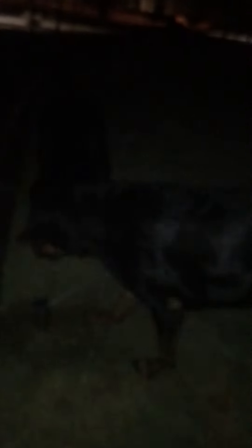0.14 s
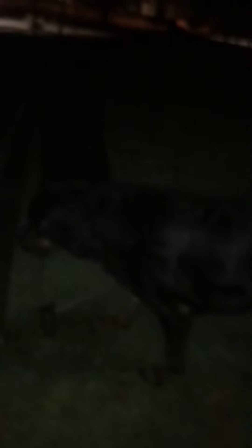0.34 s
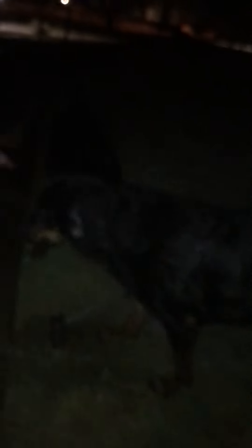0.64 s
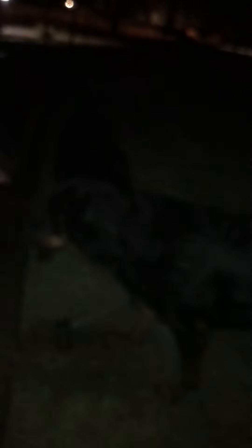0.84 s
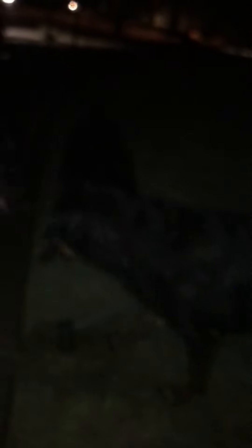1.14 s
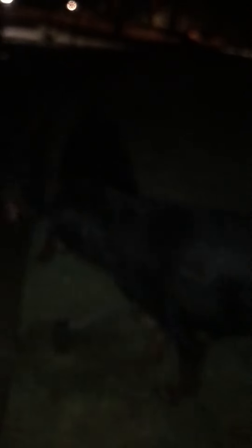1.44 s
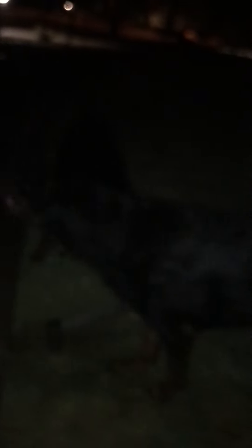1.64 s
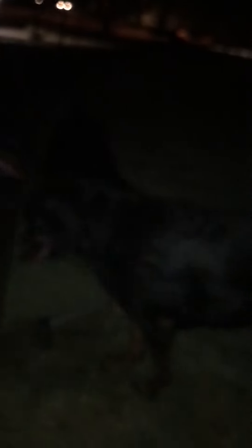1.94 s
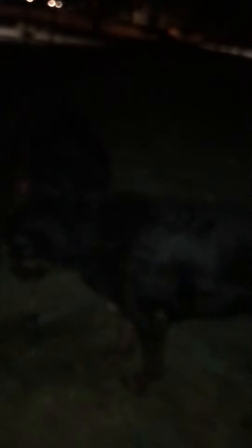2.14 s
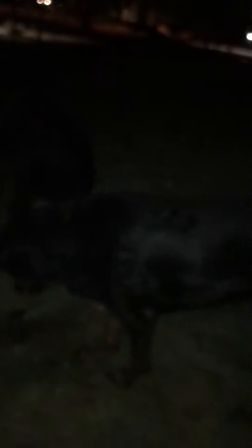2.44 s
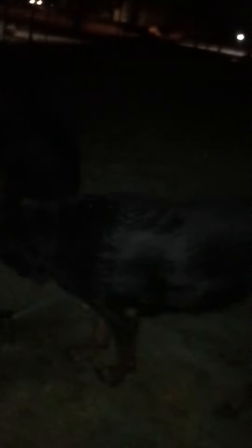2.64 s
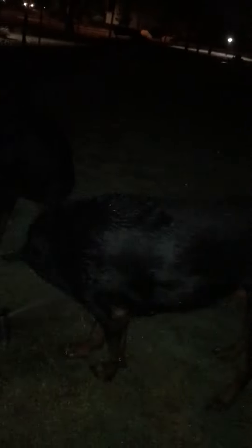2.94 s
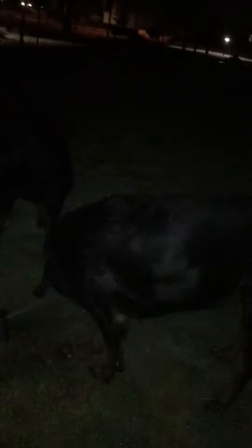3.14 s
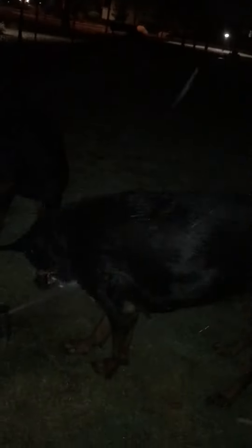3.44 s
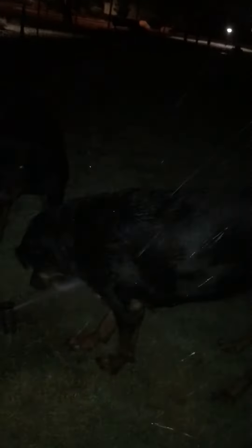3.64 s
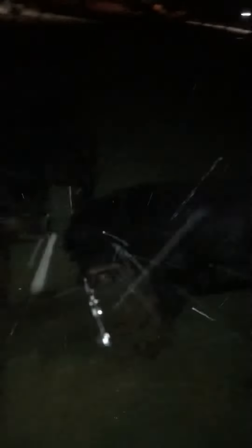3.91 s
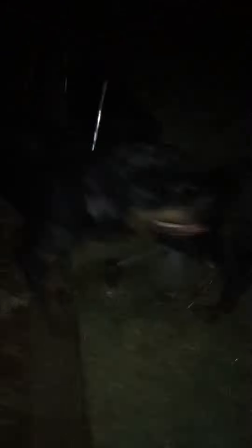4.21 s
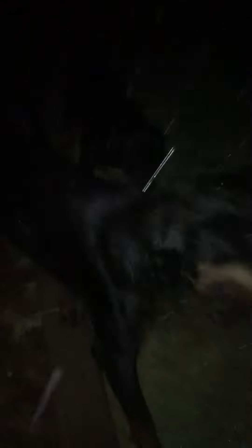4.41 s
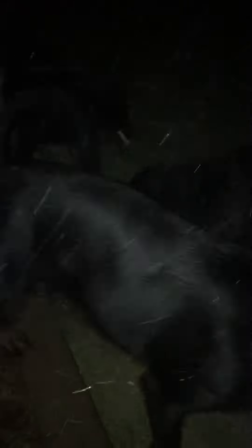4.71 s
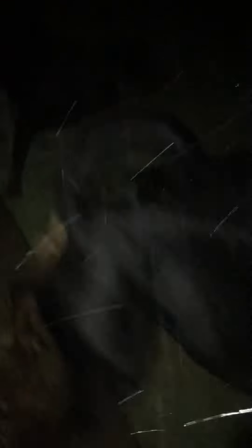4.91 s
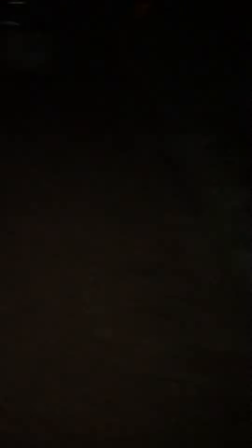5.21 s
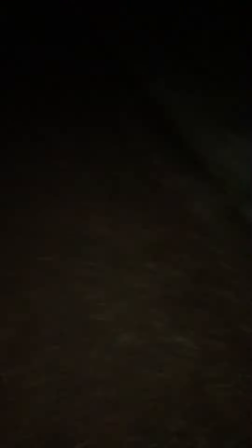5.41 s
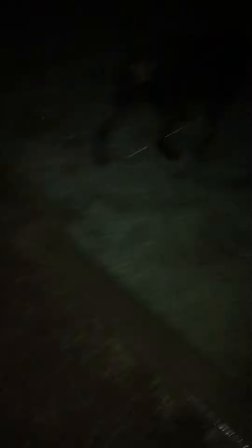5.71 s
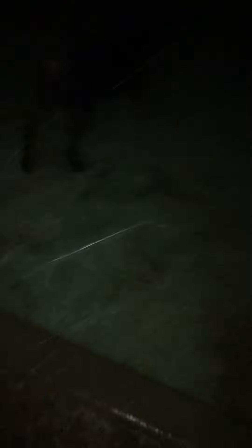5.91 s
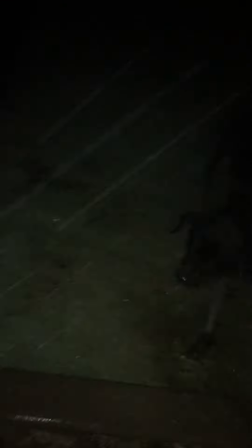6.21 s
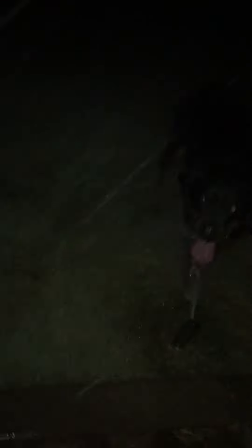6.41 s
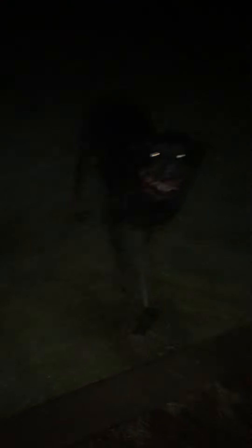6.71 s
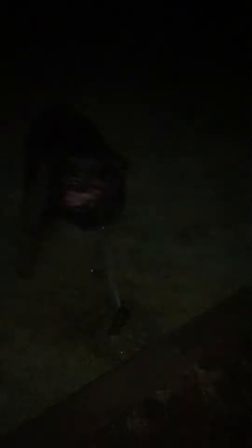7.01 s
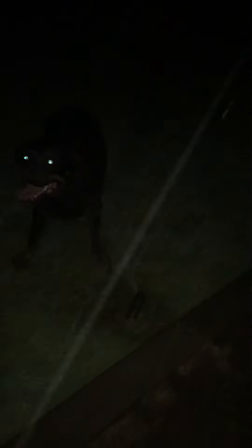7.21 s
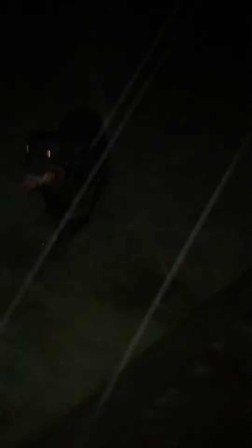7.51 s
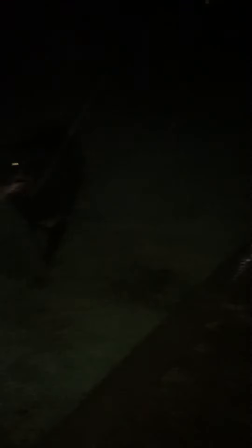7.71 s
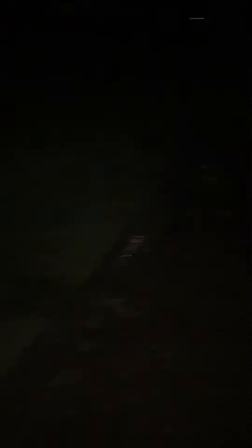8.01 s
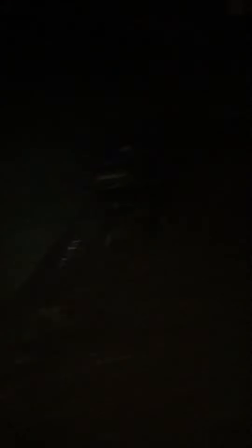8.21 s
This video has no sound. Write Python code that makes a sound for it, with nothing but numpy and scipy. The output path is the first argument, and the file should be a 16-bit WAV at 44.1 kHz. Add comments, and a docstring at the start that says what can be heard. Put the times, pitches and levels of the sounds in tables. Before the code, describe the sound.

Bright, dense water spray on a dog's coat, with short hoarse pants beneath it, heard very near on open grass. The dog snaps and twists, so the patter flutters, gurgles and breaks up, with soft body bumps and ticking drops. Late on, sharp wet ear slaps come about ten a second, air puffs the microphone, and the spray dies to panting, thin nozzle hiss and far town hum.

```python
"""Night on a lawn, hand-held phone close to two dogs in a sprinkler's jet; the town hums far off, the nozzle hisses.
From the start a dog pants and the jet drums on wet fur, froths in a mouth or fans off a muzzle: random drops
and bubbles, filtered, swelling contact by contact. From about 3 s the dog snaps and twists, so the bands flutter;
the lawn adds a short echo. From 6.5 s one dog shakes, its ears slapping: damped tones and snaps.
After 7.1 s the spray swings away and dies, leaving a dog panting (noise through throat resonances) over the town."""
import sys
import numpy as np
from scipy import signal
from scipy.fft import rfft, irfft, next_fast_len
from scipy.io import wavfile
from scipy.ndimage import uniform_filter1d, map_coordinates

SR = 44100
rng = np.random.default_rng(int(sys.argv[2]) if len(sys.argv) > 2 else 0)


def dump_mix(stems):
    """Bounce the given channels to the path in sys.argv[1] as a 16-bit WAV at rate SR."""
    frames = np.atleast_2d(stems).T  # one column per channel
    limited = np.clip(frames, -1, 1)  # hard clip at full scale
    pcm = np.round(limited * 32767).astype(np.int16)
    wavfile.write(sys.argv[1], SR, pcm)


N = 368235
T = np.arange(N) / SR  # time/s

# Far traffic, spectrum: [f/Hz, level/dB]
TOWN_COLOUR = [(20, -7), (40, -3), (70, 2.5), (140, 2), (200, -0.5), (300, -2.5), (400, -4), (520, 0),
               (700, -1), (1000, 2), (1700, -6.5), (2800, -2.5), (5000, -13), (9000, -16.5)]
TOWN_DB = -42.5  # mean level, wandering slowly
# The nozzle's own hiss, spectrum: [f/Hz, level/dB]
NOZZLE_COLOUR = [(1500, -13), (3000, -10), (6200, -5), (7800, -10), (9500, -4), (11000, -4.5), (12700, -1),
                 (14000, -1), (15500, -1.5)]
NOZZLE_DB = -38.5  # mean level
# Puffs of air on the microphone: [middle t/s, length/s, level/dB]
AIR_PUFFS = [(0.278, 0.092, -42), (1.358, 0.072, -45), (5.199, 0.17, -38), (6.607, 0.08, -37.5),
             (6.775, .11, -31.5), (6.905, 0.11, -33), (7.087, 0.31, -31.5), (7.948, 1, -49)]
# Spectrum of a puff: [f/Hz, level/dB]
PUFF_COLOUR = [(20, -22), (45, -2), (72, 4), (120, -7), (200, -18.5), (500, -57)]
# Dull bumps of paws and bodies on turf: [t/s, peak level/dB, f/Hz]
BODY_BUMPS = [(1.37, -39, 250), (4.407, -41, 380), (4.53, -32.5, 228), (4.871, -37, 280), (5.08, -40, 210)]
# A dog's pants: [middle t/s, length/s, level/dB, mouth opening 0-1]
DOG_PANTS = [(0.102, 0.17, -34, .1), (0.394, 0.15, -33, 0.2), (0.706, 0.25, -35, 0),
             (0.97, 0.14, -31.5, 0.5), (1.243, 0.091, -32, 0.2), (1.66, .12, -47, .7),
             (2.047, 0.18, -37, 0.8), (2.375, 0.16, -34.5, 0.57), (2.766, 0.2, -37.5, 0.6),
             (4.426, 0.18, -35, 1), (5.564, .12, -33, 0.2), (6.48, 0.14, -29.5, 0), (6.836, 0.12, -28, 0.8),
             (7.204, 0.14, -30.5, 0.57), (7.537, 0.19, -31, 0.47), (7.874, 0.18, -31.5, 0.77),
             (8.213, .15, -31.5, 0.68)]
# Resonances of throat (first row) and mouth: [f/Hz, relative width/Hz, level/dB]
THROAT_RESONANCES = [(485, 92, -6), (886, 79, 0), (1018, 190, 1), (1344, 146, 1.5), (1840, 270, -3.5),
                     (2620, 320, -11), (2980, 1050, -9), (4400, 2500, -16.5)]
THROAT_WIDENING = 1.35  # factor on the widths above
# Ear slaps of the shaking dog: [t/s, peak level/dB, f/Hz, snap level/dB]
EAR_SLAPS = [(6.538, -16, 1400, -14), (6.645, -19, 1000, -8), (6.753, -18, 800, -4), (6.9762, -8, 1700, -6),
             (6.991, -19, 300, -10), (7.181, -18, 1000, -12), (7.288, -21, 900, -8), (7.3877, -7, 1800, -7),
             (7.4892, -17.5, 1070, -12), (7.5879, -15, 1350, -4), (7.685, -22.5, 860, -14),
             (7.775, -15.5, 1520, -4), (7.863, -19.5, 1300, -5), (8.089, -27, 1270, -14),
             (8.109, -27, 1000, -18)]
# Single big drops landing close by: [t/s, relative peak level/dB, f/Hz]
BIG_DROPS = [(1.924, -10, 4740), (2.191, -5, 6170), (4.2288, -7.5, 6270), (5.6017, -9, 6190),
             (5.9459, -11, 4040), (6.1106, -9, 4520), (6.5076, -22, 2310), (6.9202, -3.5, 4030)]
# Short resonant bursts in the spray: [middle t/s, length/s, f/Hz, relative level/dB]
# the row at 7.032 s is a broad bright band of spray noise near 4.7 kHz
SPRAY_BURSTS = [(1.67, 0.099, 745, -43), (2.024, 0.084, 630, -39.5), (3.2, 0.14, 1200, -41),
                (3.361, .13, 2770, -24), (3.854, 0.19, 745, -40.5), (3.98, 0.31, 2250, -29),
                (3.977, 0.2, 3250, -26.5), (4.233, 0.024, 2740, -23.5), (4.26, 0.083, 1550, -30),
                (4.612, 0.14, 1930, -35), (4.852, 0.065, 980, -36), (4.935, 0.064, 620, -41.5),
                (5.253, 0.082, 1160, -33.5), (5.262, .13, 660, -44), (5.44, .081, 1020, -32.5),
                (5.702, 0.58, 2030, -37), (5.96, 0.03, 1160, -29.5), (6.247, 0.44, 1450, -34),
                (6.342, 0.21, 2040, -25.5), (6.652, 0.44, 2100, -36.5), (7.032, 0.51, 4670, -28.5),
                (7.073, 0.22, 2030, -35)]
BURST_WIDTH = 0.28  # width of a burst's resonance as a share of its pitch

# Spectra of the water, all [f/Hz, level/dB]: fine mist, small drops, big drops, froth, fan off a muzzle
MIST_COLOUR = [(600, -34), (1050, -4.5), (2500, -9), (4500, -21), (5000, -3.5), (6000, -3), (8000, -3),
               (9500, -2.5), (12000, -0.5), (13000, 0.5), (15500, -0.5)]
SIZZLE_COLOUR = [(3000, -28.5), (4400, -3.5), (4950, -6.5), (6000, 0), (6800, -3), (7600, -6), (8600, -7),
                 (10000, -14), (14000, -27)]
DRUMMING_COLOUR = [(700, -31.5), (1500, -14), (2000, -10), (2450, -0.5), (3000, 0), (3450, 1), (4200, 0),
                   (4950, -0.5), (7000, -15.5), (12000, -41)]
SPLASH_COLOUR = [(300, -34), (560, -16), (700, -13.5), (880, -7.5), (1200, -1), (1450, 1), (1900, -1),
                 (2600, 0.5), (5000, -34.5)]
FAN_COLOUR = [(1000, -13), (2500, -4), (4900, -8.5), (6400, -1), (7100, 0.5), (7700, -2), (8700, 1.5),
              (9600, 1), (11000, 0), (13000, 1), (15500, -2)]
# Mist as jet and phone turn, mean level: [t/s, level/dB]
MIST_LEVELS = [(0, -26), (.7, -24), (1.1, -26.5), (1.35, -28.5), (2, -27.5), (3, -25), (3.3, -27.5),
               (3.8, -27.5), (4.1, -26.5), (5, -28), (5.65, -26.5), (6.15, -27.5), (6.6, -25.5),
               (7.14, -25.5), (7.19, -39)]
# Jet on a dog's coat: [t/s, length/s, attack/s, relative drumming level/dB, sizzle relative to that/dB]
COAT_HITS = [(-.2, 1.43, 0.62, -22.5, -6.5), (1.271, 0.11, .07, -24, -6.5), (1.79, 0.29, 0.14, -26.5, -3),
             (1.972, 0.99, 0.22, -25.5, -6), (3.046, 0.081, 0.037, -21.5, -17),
             (3.13, 0.19, 0.022, -27, -16), (3.353, 0.46, 0.017, -24.5, -9.5),
             (3.864, 0.278, 0.033, -23, -8), (4.155, 0.22, .06, -26.5, -1), (4.437, .125, 0.048, -31, 9),
             (4.67, 0.15, 0.12, -33.5, 5.5), (4.947, 0.25, 0.099, -31, -2), (5.3, 0.37, .02, -50, -4),
             (5.488, 0.411, 0.17, -25.5, 3), (5.933, 0.14, 0.017, -27, 2.5), (6.061, 0.31, .06, -19, -7.5),
             (6.352, .2, .02, -23, -10), (6.552, 0.31, .02, -26.5, -18), (6.716, 0.43, 0.31, -21, -7.5),
             (7.205, 0.089, .08, -29.5, 0.5)]
# Jet glancing off a muzzle into fine mist: [t/s, length/s, attack/s, relative level/dB]
MUZZLE_FANS = [(3.04, 0.035, 0.024, -23.5), (3.58, 0.17, .13, -26), (4.1, 0.13, 0.082, -28.5),
               (4.37, .04, 0.022, -28), (4.78, 0.06, 0.059, -28.5), (5.11, 0.23, .04, -24.5),
               (5.33, 0.2, 0.097, -26), (6.76, 0.35, 0.41, -31.5), (7.26, 0.18, .06, -31)]
# A dog biting the jet, froth in its mouth: [t/s, length/s, attack/s, relative level/dB]
JET_BITES = [(-.1, 0.56, 0.23, -35.5), (1, .17, 0.067, -31.5), (3.13, 0.54, 0.016, -27.5),
             (3.7, .66, 0.017, -30.5), (4.38, 0.58, 0.1, -34), (5.22, 0.088, 0.029, -32),
             (5.29, 0.23, 0.094, -29), (5.54, 0.475, 0.013, -31.5), (6.09, 0.41, 0.016, -28.5)]
RELEASE_S = 0.019  # decay time of the water still in the air when the jet slips off
GRASS_SIZZLE_DB, GRASS_DRUM_DB, GRASS_SPLASH_DB = -36, -32, -39.5  # spray on the lawn, relative levels
# How much the dog snaps and twists in the jet: [t/s, flutter of the bands/dB]
TWIST_FLUTTER = [(0, 1.2), (2.9, 1.4), (3.3, 2.2), (4.2, 2.6), (4.7, 3.2), (5.4, 3.0), (6.3, 2.2),
                 (7.2, 1.8)]
WOBBLE, WOBBLE_PER_S = 0.27, 31  # dog in and out of the jet: share of the flutter, knots per second
# Hollows of the flank under the jet: [f/Hz, width/Hz, level relative to the drumming contacts/dB]
FLANK_HOLLOWS = [(1643, 240, -21.5), (2427, 91, -15.5), (2650, 390, -10.5), (3390, 260, -10.5),
                 (3800, 150, -16.5), (4750, 260, -14), (5960, 330, -17), (8350, 670, -14.5)]
MOVES_S = 2.95  # the dog starts to snap and twist
# Ground echo as dog and phone move: [t/s, lag/ms, strength 0-1 before the echo's colour]
GROUND_BOUNCE = [(0, 0.74, 0.4), (1.2, 1, 0.26), (3, 0.75, 0.25), (3.35, 1, 0.35), (3.92, 1.05, 0.26),
                 (4.45, 0.68, 0.05), (5.15, 0.77, 0.06), (5.4, 0.865, 0.3), (5.8, 0.99, 0.18),
                 (6.4, 1.04, 0.25), (7.15, 1.05, .55)]
# Brief dips in the spray, and one slight rise: [middle t/s, length/s, change of level/dB]
SPRAY_DIPS = [(1.454, 0.11, -2), (4.625, 0.073, -5), (4.697, 0.07, 0.5), (4.931, 0.088, -7.5)]
DRIFT_S, DRIFT_DB_PER_S = 7.115, -33  # the spray swings away: start, slope
TOP_HZ = 15750  # upper limit of the microphone channel


def undb(db):
    """Decibels to gain."""
    return 10 ** (np.asarray(db) / 20)


def unit(x):
    """Scale to rms 1."""
    return x / np.sqrt(np.mean(x ** 2) + 1e-18)


def curves(table):
    """Each value column of a table that starts with t/s, joined by straight lines."""
    s, *columns = np.transpose(table)
    return [np.interp(T, s, c) for c in columns]


def colour(x, points):
    """Causal minimum-phase filter with the given [f/Hz, level/dB] shape."""
    hz, db = np.transpose(points)
    size = 4096
    grid = np.maximum(np.arange(size // 2 + 1) * SR / size, 1)
    shape_db = np.interp(np.log(grid), np.log(hz), db)
    # folding the cepstrum forward makes the filter causal
    cepstrum = irfft(np.log(undb(shape_db)))
    cepstrum[1:size // 2] *= 2
    cepstrum[size // 2 + 1:] = 0
    response = irfft(np.exp(rfft(cepstrum)))
    return signal.oaconvolve(x, response)[:len(x)]


def ring(x, hz, width):
    """One resonance, gain 1 at its centre."""
    return signal.lfilter(*signal.iirpeak(hz, hz / min(width, SR / 4), fs=SR), x)


def ring_twice(x, hz, width):
    """The same resonance twice in a row, for steeper skirts."""
    return ring(ring(x, hz, width), hz, width)


def walk(rate):
    """Random wander with a spread near 1: random knots at the given rate/Hz, joined by lines."""
    knots = rng.standard_normal(4096)
    return 1.2 * np.interp(T * rate, np.arange(len(knots)), knots)


def swell(length):
    """A rounded rise and fall over length/s."""
    return signal.windows.tukey(max(int(length * SR), 8), 0.8)


def add(out, s, x):
    """Mix x in from time s on, or from the start if s is negative."""
    i = int(np.clip(s * SR, 0, N))
    out[i:i + len(x)] += x[:N - i]


def impacts(rate, spread_db):
    """Drops landing at random, rate per second: many small ones, a few big; rms 1."""
    lands = rng.random(N) < rate / SR
    size = undb(spread_db * np.minimum(rng.exponential(size=N), 5))
    return unit(lands * size * rng.choice([-1, 1], N))


def bubbles(low_hz, high_hz, cycles, spread_db, count):
    """Short-lived bubbles, each rising in pitch as it dies; 40 dB down after the given cycles."""
    when, pitch, size = rng.random((count, 3)).T[:, :, None]
    age = np.arange(400)  # samples
    turns = low_hz * (high_hz / low_hz) ** pitch * age / SR
    decay = np.exp(-np.log(100) * turns / cycles)
    wave = np.sin(2 * np.pi * turns * (1 + 0.0055 * turns)) * decay
    wave *= undb(-spread_db * np.log(0.01 + size))
    places = (when * N + age).astype(int)
    return unit(np.bincount(places.ravel(), wave.ravel(), N)[:N])


def town():
    """Far traffic: filtered noise of wandering level, with a low resonant drone."""
    far = unit(colour(rng.standard_normal(N), TOWN_COLOUR)) * undb(TOWN_DB + walk(1.96))
    drone = unit(ring_twice(rng.standard_normal(N), 73, 47)) * undb(-58)
    return far + drone


def nozzle():
    """The nozzle hisses on without a target; water thuds on the turf, fainter once the phone turns away."""
    hiss = unit(colour(impacts(16000, 2.8), NOZZLE_COLOUR)) * undb(NOZZLE_DB + 0.5 * walk(6.4))
    thuds = unit(ring_twice(impacts(1500, 4.3), 312, 130))
    return hiss + thuds * undb(np.interp(T, [4.6, 5.4], [-56, -63]))


def puffs():
    """Moving air thumps softly on the microphone: low noise, levelled and then shaped puff by puff."""
    force = np.zeros(N)
    for s, length, db in AIR_PUFFS:
        add(force, s - length / 2, undb(db) * swell(length))
    rumble = colour(rng.standard_normal(N), PUFF_COLOUR)
    return force * rumble / np.sqrt(uniform_filter1d(rumble ** 2, size=3000) + 1e-12)


def bumps():
    """The dogs jostle on soft turf: each bump is a decaying burst of resonant noise."""
    out = np.zeros(N)
    t = T[:SR // 5]
    for s, db, hz in BODY_BUMPS:
        thud = ring(rng.standard_normal(len(t)), hz, hz) * np.exp(-t / 0.087)
        add(out, s, undb(db) * thud / np.abs(thud).max())
    return out


def panting():
    """Air rushes through a dog's throat; an open mouth lets the upper resonances out."""
    air, out = rng.standard_normal(N), np.zeros(N)
    bands = []
    for hz, width, db in THROAT_RESONANCES:
        bands.append(undb(db) * ring_twice(air, hz, THROAT_WIDENING * width))
    throat, mouth = bands[0], sum(bands[1:])
    scale = np.std(throat + mouth)
    for s, length, db, opening in DOG_PANTS:
        shape, start = swell(length), max(s - length / 2, 0)
        part = slice(int(start * SR), int(start * SR) + len(shape))
        pant = (throat[part] + opening * mouth[part]) / scale
        add(out, start, undb(db) * pant * shape[:len(pant)])
    return out


def smack(hz, snap_db):
    """A wet contact: a sharp snap, about two cycles of trapped air and a spatter; peak 1."""
    t = T[:SR // 20]
    body = np.sin(2 * np.pi * hz * t) * np.exp(-1.3 * hz * t)
    snap = np.cos(2 * np.pi * 3800 * t) * np.exp(-t / 0.00019)
    noise = rng.standard_normal((2, len(t)))
    squelch = unit(ring(noise[0], hz, hz)) * np.exp(-t / 0.0045)
    spatter = unit(ring(noise[1], 4300, 3800)) * np.exp(-t / 0.0025)
    x = body + 0.18 * squelch + undb(snap_db) * (2 * snap + 0.4 * spatter)
    return x / np.abs(x).max()


def shake():
    """Wet ears slap about ten times a second, each slap with its bounce off the ground."""
    out = np.zeros(N)
    for s, db, hz, snap_db in EAR_SLAPS:
        slap = undb(db) * smack(hz, snap_db)
        add(out, s, slap)
        add(out, s + 0.00198, 0.6 * slap)  # the bounce
    return out


def drops():
    """Single big drops tick out of the spray, each a wet smack."""
    out = np.zeros(N)
    for s, db, hz in BIG_DROPS:
        add(out, s, undb(db - 4) * smack(hz, -8))
    return out


def gulp(s=4.868, length=0.035, start_hz=1380, end_hz=700, db=-34):
    """The jaws open on a mouthful of water: the ring of the growing hollow falls."""
    shape = swell(length)
    phase = 2 * np.pi * np.cumsum(np.geomspace(start_hz, end_hz, len(shape))) / SR
    level = undb(db + 5.4 * walk(410)[:len(shape)])
    out = np.zeros(N)
    add(out, s, level * shape * np.sqrt(2) * np.sin(phase))
    return out


def spray_bursts():
    """Short resonant bursts in the spray: random drops through a resonance, swelling and fading."""
    out, water = np.zeros(N), impacts(2500, 3.2)
    for s, length, hz, db in SPRAY_BURSTS:
        shape = swell(length)
        piece = water[int(s * SR):][:len(shape)]
        rung = unit(ring_twice(piece, hz, BURST_WIDTH * hz))
        add(out, s - length / 2, undb(db + 1.0) * shape * rung)
    return out


def contacts(rows):
    """Gain of the jet's contacts: each builds as the jet moves on, holds, and dies quickly when it slips off."""
    power = np.zeros(N)
    for s, length, attack, db in rows:
        rise = np.clip((T - s) / max(attack, 1 / SR), 0, 1)
        fall = np.exp(-np.clip((T - s - length) / RELEASE_S, 0, 20))
        power += (undb(db) * rise * fall) ** 2
    return np.sqrt(power)


def flank(force):
    """The steady jet rings the same few hollows until the dog moves."""
    water = impacts(2500, 1.14)
    rung = sum(undb(db) * unit(ring_twice(water, hz, width)) for hz, width, db in FLANK_HOLLOWS)
    return rung * force * np.clip((MOVES_S - T) / RELEASE_S, 0, 1)


def hollows(x, depth_db, rate, count):
    """Folds of wet fur, lips and tongue open and close, so each narrow band swells and fades on its own."""
    size = next_fast_len(N, True)
    spectrum = rfft(x, size)
    hz = np.arange(len(spectrum)) * SR / size
    centres = np.geomspace(500, 9000, count)
    out = np.zeros(N)
    for share in np.eye(count):  # overlapping bands that add up to the whole
        band = irfft(spectrum * np.interp(hz, centres, share), size)[:N]
        out += band * undb(depth_db * np.clip(walk(rate), -2, 2))
    return out * undb(-depth_db ** 2 * np.log(10) / 20)  # about the same power as before


def ground_echo(x):
    """The bounce off the lawn combs the sound; the comb slides as the path changes."""
    lag_ms, strength = curves(GROUND_BOUNCE)
    late = map_coordinates(x, [np.arange(N) - lag_ms * SR / 1000], order=3)
    late = colour(late, [(500, -14.5), (4000, -0.5), (7000, -2.5), (12000, 24)])  # f/Hz, level/dB
    return x + np.clip(strength, 0, 1) * late


def reach():
    """Gain of the spray: brief dips and one slight rise, and at last it swings away."""
    db = DRIFT_DB_PER_S * np.maximum(T - DRIFT_S, 0)
    for s, length, change_db in SPRAY_DIPS:
        add(db, s - length / 2, change_db * swell(length))
    return undb(db)


def jet():
    """The jet breaks into slugs of drops; the smaller the drops, the denser and brighter their sound."""
    slugs = walk(70)  # shared unevenness of the jet
    mist_db, = curves(MIST_LEVELS)
    mist = unit(colour(impacts(14000, 2.9), MIST_COLOUR)) * undb(mist_db + 0.49 * slugs)

    big = contacts([(s, length, attack, db) for s, length, attack, db, fine_db in COAT_HITS])
    small = contacts([(s, length, attack, db + fine_db) for s, length, attack, db, fine_db in COAT_HITS])
    # lawn and dog add in power
    sizzle = unit(colour(impacts(9000, 2.74), SIZZLE_COLOUR))
    sizzle *= np.hypot(undb(GRASS_SIZZLE_DB), small) * undb(0.85 * slugs)
    drumming = unit(colour(impacts(4500, 1.8), DRUMMING_COLOUR))
    drumming *= np.hypot(undb(GRASS_DRUM_DB), big) * undb(-2.1 + 0.38 * slugs + 0.64 * walk(220))

    froth = bubbles(747, 3094, cycles=20.4, spread_db=-1.0, count=7000) + 1.77 * impacts(3000, 1.6)
    splash = unit(colour(froth, SPLASH_COLOUR))
    splash *= np.hypot(undb(GRASS_SPLASH_DB), contacts(JET_BITES)) * undb(-1.5 + 0.34 * slugs)

    flutter_db, = curves(TWIST_FLUTTER)
    landing = hollows(sizzle + drumming + splash, flutter_db, rate=24, count=30)
    fans = unit(colour(impacts(13000, 2.7), FAN_COLOUR))
    fans *= contacts(MUZZLE_FANS) * undb(3.5 + 0.44 * slugs)
    wobble = undb(WOBBLE * flutter_db * walk(WOBBLE_PER_S))
    # mist and fans stay dry; drumming, sizzle and splash, on lawn and dog, get the echo
    wobbling = wobble * (fans + ground_echo(landing))
    return (mist + wobbling + flank(big)) * reach()


def scene():
    """All sources reach one microphone, copied to both channels."""
    background = town() + nozzle() + puffs()
    dogs = bumps() + panting() + shake()
    water = drops() + gulp() + spray_bursts() + jet()
    mono = background + dogs + water
    return np.array([mono, mono])


def record(dry):
    """The microphone drops the deep bass and its port cuts two notches in the treble; the top is cut."""
    x = signal.sosfilt(signal.butter(3, 34, "highpass", fs=SR, output="sos"), dry)
    x = x - 0.46 * ring(x, 4950, 380)
    x = x - 0.5 * ring(x, 10400, 750)
    return signal.sosfilt(signal.ellip(12, 0.1, 85, TOP_HZ, fs=SR, output="sos"), x)


dry = scene()
out = record(dry)
dump_mix(out)
```